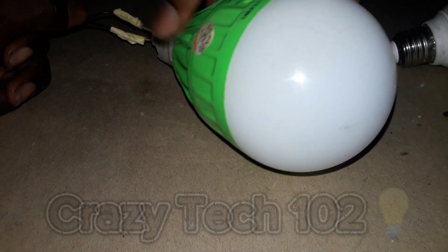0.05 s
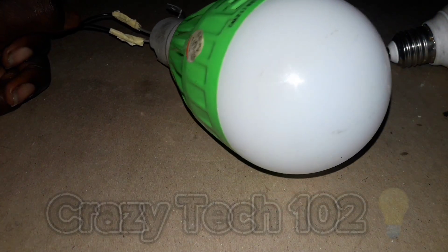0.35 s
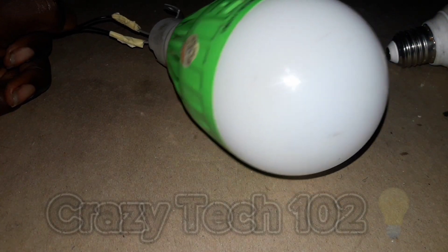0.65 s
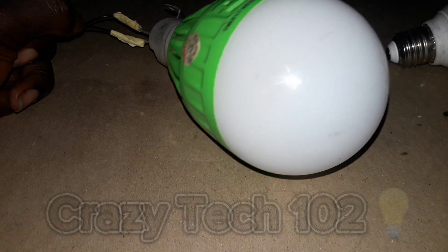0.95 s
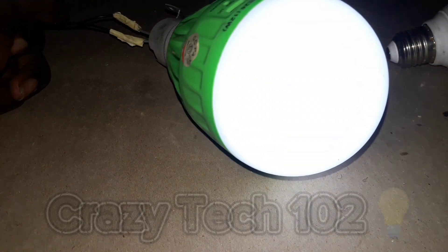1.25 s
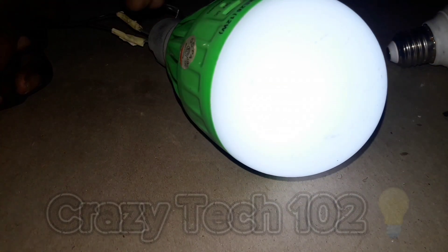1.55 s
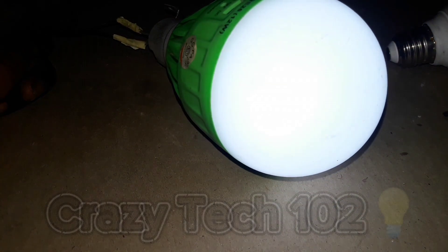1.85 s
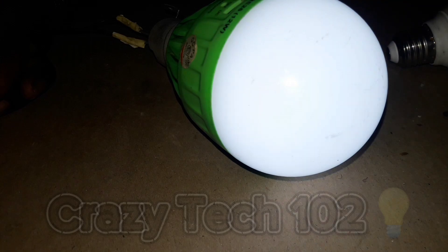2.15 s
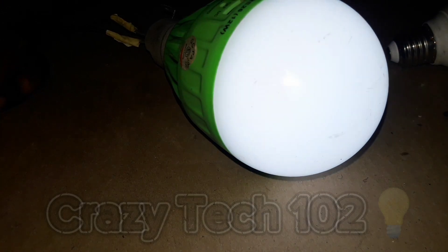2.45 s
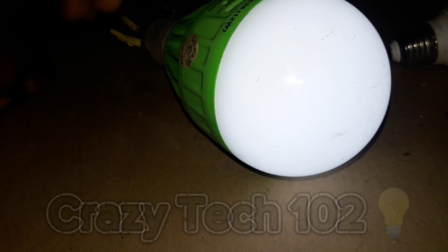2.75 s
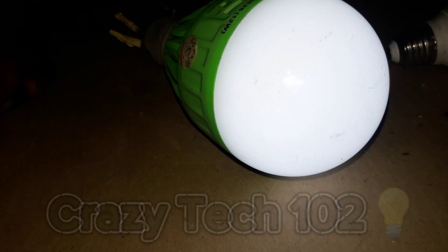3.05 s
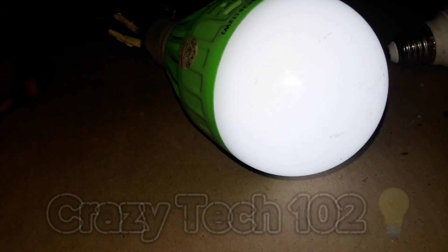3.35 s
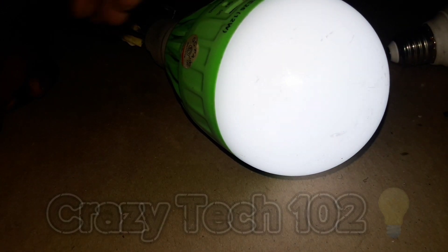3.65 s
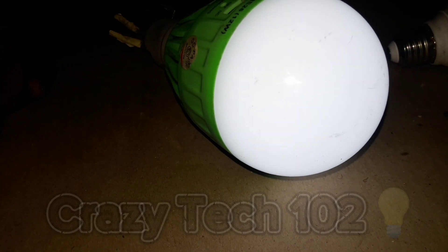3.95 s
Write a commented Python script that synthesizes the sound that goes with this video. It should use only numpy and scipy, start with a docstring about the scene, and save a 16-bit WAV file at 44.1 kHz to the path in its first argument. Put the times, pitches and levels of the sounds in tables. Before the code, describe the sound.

Close, raspy gear whine of a small generator turned by hand, speeding up with each push.

```python
"""A close, surging gear whine: a small generator cranked by hand to light a bulb.
Each push speeds up the rotor and sweeps the tooth harmonics through the housing's resonances.
The teeth rasp, and chatter at the fastest push; the unbalanced rotor growls underneath.
A brief rustle and faint handling lead in, and a low hum fills the room throughout."""
import sys
import numpy as np
from scipy.fft import rfft, irfft, next_fast_len
from scipy.io import wavfile
from scipy.ndimage import map_coordinates

SR = 44100
rng = np.random.default_rng(int(sys.argv[2]) if len(sys.argv) > 2 else 0)


def waveform_to_disk(signal):
    """Save audio, clipped to [-1, 1], as 16-bit WAV at the path in sys.argv[1]."""
    frames = np.transpose(np.atleast_2d(signal))
    scaled = np.clip(frames, -1, 1) * 32767
    samples = np.round(scaled).astype(np.int16)
    wavfile.write(sys.argv[1], SR, samples)


N = 176400
TEETH, REF_HZ = 10, 160  # teeth per rotor turn; reference rotor speed


def generator():
    """One rotor, surging with each push of the hand, drives every gear layer."""
    # rotor speed: t/s, rate/Hz
    pushes = [(1.0, 61.5), (1.08, 72.18), (1.2, 106.75), (1.33, 108.12), (1.42, 97.23), (1.51, 85.91),
              (1.58, 97.76), (1.79, 153.08), (1.95, 127.27), (2.03, 112.05), (2.11, 104.99), (2.25, 150.36),
              (2.31, 172.58), (2.43, 167.15), (2.52, 144.04), (2.6, 130.9), (2.67, 139.03), (2.75, 156.26),
              (2.82, 167.89), (2.9, 156.14), (3.1, 162.25), (3.2, 169.34), (3.3, 181.98), (3.53, 163.19),
              (3.66, 197.26), (3.72, 207.1), (3.79, 189.33), (3.87, 170.74), (3.93, 175.86), (4.0, 177.54)]
    speed = glide(pushes) * (1 + .002 * wobble(45))
    angle = 2 * np.pi * np.cumsum(speed) / SR
    return whine(speed, angle) + rasp(angle) + growl(speed, angle) + start_up(angle)


def whine(speed, angle):
    """Mesh harmonics and sidebands swell as they sweep through the housing's resonances."""
    # tooth harmonics 1-8: level/dB, growth/dB per speed doubling
    mesh = [(-1, 32.5), (0.5, 18), (-7, 15), (-6, 17.5), (-7.5, 16.5), (-13.5, 7), (-18.5, 0), (-30.5, -5)]
    # sidebands of uneven teeth: rotor multiple, level/dB, growth/dB per speed doubling
    sidebands = [(7, -15.5, 15), (8, -1, 12), (9, -10, 40), (11, -13, 16.5), (12, -8, 22.5)]
    # faint extra whine lines, weak sidebands and two high tooth harmonics: rotor multiple
    faint_orders = [17, 18, 19, 21, 22, 24, 27, 62, 90, 100]
    # housing response: f/Hz, gain/dB
    housing = [(500.0, -38), (800.0, -40), (1110.0, -17.5), (1220.0, -12.5), (1340.0, -22.5), (1500.0, -20),
               (1700.0, -11), (2050.0, -11.5), (2450.0, -17.6), (2750.0, -9), (3070.0, 2.3), (3280.0, -1.5),
               (3420.0, -1), (3750.0, -9), (4100.0, -6), (4350.0, -15.5), (5000.0, -10), (5450.0, -5),
               (5800.0, -11.3), (6150.0, -3.5), (6500.0, -5.5), (6760.0, 1), (7300.0, -7.5), (7900.0, -16),
               (8400.0, -37), (9100.0, -21), (9700.0, -32), (11500.0, -12), (16000.0, -12)]
    # how firmly the teeth mesh: t/s, level/dB
    contact = [(0.98, -57), (1.06, -6), (1.12, -1), (1.18, -1.4), (1.25, 6.5), (1.33, 3), (1.44, 4.5),
               (1.55, 0.5), (1.63, 3.3), (1.7, -2.5), (1.8, 4), (1.92, -1), (2.03, 2.6), (2.16, 1.5),
               (2.28, 0), (2.33, 1.3), (2.43, 0.5), (2.49, 0), (2.53, 0.5), (2.68, -0.7), (2.76, 2.4),
               (2.87, -1), (3.0, -0.6), (3.13, -0.7), (3.19, 2.1), (3.24, -4.5), (3.3, 1.7), (3.36, -3.6),
               (3.42, 1.5), (3.49, -7.5), (3.62, -3.5), (3.68, -6), (3.73, -7.8), (3.85, -6), (4.0, -1.6)]
    harmonics = [(TEETH * k, db, growth) for k, (db, growth) in enumerate(mesh, 1)]
    faint = [(order, -26, 0) for order in faint_orders]
    octaves = np.log2(speed / REF_HZ)
    out = np.zeros(N)
    for order, db, growth in [*harmonics, *sidebands, *faint]:
        flicker_db = (2.3 + .9 * np.log2(order / (2 * TEETH))) * wobble(48)  # deeper up high
        level = db + growth * octaves + along(housing, order * speed) + flicker_db
        roughness = 1 + .17 * (wobble(520) + 1j * wobble(520))
        play_rad = .007 * (REF_HZ / speed) * wobble(200)  # gear play blurs the high partials
        phase = order * (angle + play_rad) + rng.uniform(0, 2 * np.pi)
        out += amp(level) * np.real(roughness * np.exp(1j * phase))
    return np.sqrt(2) * amp(curve(contact) - 14.5) * (1 + 6.2 * chatter()) * out


def rasp(angle):
    """Each tooth rubs in a tiny noise burst, harder on one side of the turn."""
    # rubbing strength: t/s, level/dB
    rubbing = [(1.0, -67), (1.03, -49.5), (1.24, -39.5), (1.55, -43.5), (1.8, -34), (1.96, -39.5),
               (1.98, -38), (1.99, -39), (2.04, -39.5), (2.36, -31), (2.6, -38), (3.41, -31), (3.5, -33.5),
               (3.78, -29), (3.84, -39.5), (4.0, -33.5)]
    # rasp colour: f/Hz, gain/dB
    colour = [(300, -18), (800, -27), (1200, -17), (1550, -16.5), (1800, -5.5), (2100, -7.5), (2450, -10.5),
              (2800, -1.5), (3150, 9.5), (3550, 4.5), (4000, -8), (4550, -7), (5300, -0.5), (6000, 1.5),
              (6800, 4.5), (7500, -5.5), (8400, -23), (9800, -20), (12000, -14.5), (15800, -14)]
    pulses = np.exp(.3 * np.cos(TEETH * angle) + .1 * np.cos(angle))
    grain = amp(.7 * wobble(300))
    fade_in = np.clip((clock() - 1) / .1, 0, 1)
    level = amp(14.5 + curve(rubbing)) * fade_in
    return (level + chatter()) * noise(colour, pulses * grain)


def chatter():
    """Envelope of the short bursts of tooth chatter that kick the whine and rasp."""
    # chatter bursts: t/s, length/s, level/dB
    bursts = [(1.975, 0.015, -37), (2.129, 0.0083, -44), (3.716, 0.016, -14.5), (3.748, 0.013, -21),
              (3.779, .022, -19)]
    return sum(amp(db) * np.exp(-(2 * (clock() - s) / length) ** 2) for s, length, db in bursts)


def growl(speed, angle):
    """The unbalanced rotor hums and shakes the housing once a turn, harder with speed."""
    # shaken housing's colour: f/Hz, gain/dB
    colour = [(700, -34), (1050, -25), (1250, -7.5), (1450, -23), (1730, 5.5), (2100, -5.5), (2450, -13),
              (3500, -25)]
    octaves = np.log2(speed / REF_HZ)
    fade_in = np.clip((clock() - 1) / .34, 0, 1)
    shaft = np.sqrt(2) * amp(-41.5 + 11.5 * octaves + .86 * wobble(14)) * np.sin(angle)
    pulses = np.exp(1.3 * np.cos(angle))
    shake = noise(colour, pulses) * amp(-32.5 + 15.5 * octaves + 3.6 * wobble(24.89))
    return fade_in * (shaft + shake)


def start_up(angle):
    """The slow gears scrape, and two rough mesh harmonics squeal up through the same resonance."""
    # scrape swell: t/s, level/dB
    swell = [(.99, -63), (1.005, -37), (1.04, -38), (1.05, -28), (1.065, -32.5), (1.09, -22.5),
             (1.135, -20.5), (1.18, -26), (1.3, -46)]
    # scrape resonance: f/Hz, gain/dB
    resonance = [(2000, -34), (2700, -17), (3200, -5.5), (3480, 3.5), (3750, -1), (4200, -32), (6000, -55)]
    # squealing harmonics: rotor multiple
    orders = [40, 50]
    tones = sum(np.cos(order * angle + .8 * wobble(250)) for order in orders)
    squeal = np.sqrt(2) * filtered(tones, lambda hz: amp(along(resonance, hz)))
    level = amp(curve(swell) + 2.8 * wobble(110))
    return level * (.5 * noise(resonance) + amp(-1) * squeal)


def rustle():
    """A bright puff of noise that dies away at once."""
    # rustle colour: f/Hz, gain/dB
    colour = [(530, -47), (900, -15), (1180, -11), (1420, -22), (1770, -3.5), (2890, -14), (3140, -7.5),
              (5120, -4), (6820, -6), (8340, -19), (15500, -9.5)]
    return amp(-25.5 - 177 * clock()) * noise(colour)


def handling():
    """Fingers on the crank make a faint, grainy noise."""
    # finger movement: t/s, level/dB
    touch = [(.3, -63), (.58, -50.5), (.65, -54), (.84, -48.5), (1.0, -54), (1.1, -61)]
    # handling colour: f/Hz, gain/dB
    colour = [(1200, -11), (1750, -3.5), (2200, -20), (4500, -10), (5800, 0), (6700, -3.5), (7600, -20)]
    return amp(curve(touch)) * noise(colour, gate=amp(1.6 * wobble(60.1)))


def knocks():
    """Light knocks ring the housing's short-lived modes."""
    # knocks: t/s, level/dB
    hits = [(.458, -53), (.52, -42.5), (0.574, -40.5), (2.112, -20), (2.44, -25)]
    # housing modes: f/Hz, level/dB, t60/s
    modes = [(1200, -12.5, 0.075), (1713, 1.5, 0.035), (2900, -11, 0.019), (3480, -24, .025)]
    out = np.zeros(N)
    for s, hit_db in hits:
        age = np.maximum(clock() - s, 0)
        for hz, mode_db, t60 in modes:
            out += amp(hit_db + mode_db - 60 * age / t60) * np.sin(2 * np.pi * hz * age)
    return out


def room():
    """A bed of wavering hum, low rumble and faint hiss."""
    # hum lines: f/Hz, level/dB
    lines = [(60, -55.5), (134, -49.5), (344.5, -46.5)]
    # rumble colour: f/Hz, gain/dB
    rumble = [(15, -65), (25, -35), (49, -19.5), (96, -8), (124, -2.5), (178, 0), (215, -2.5), (310, -6),
              (341, -3.5), (375, -11), (439, -9.5), (740, -26.5), (1100, -24), (1430, -54), (2420, -120)]
    # hiss colour: f/Hz, gain/dB
    hiss = [(530, 7), (900, -8.5), (1430, -7.5), (2510, -8.5), (2660, -11), (4130, -12), (4880, -12),
            (6650, -10.5), (7770, -20.5), (15500, -9)]
    hum = sum(amp(db + 2.5 * wobble(10)) * np.sin(2 * np.pi * hz * clock() + .9 * wobble(5.1))
              for hz, db in lines)
    return np.sqrt(2) * hum + amp(-42) * noise(rumble) + amp(-50) * noise(hiss)


def amp(db):
    """Decibels to gain."""
    return 10 ** (np.asarray(db) / 20)


def along(points, hz):
    """Read (f/Hz, value) points on a log frequency axis."""
    f, v = np.transpose(points)
    return np.interp(np.log(hz + 1), np.log(f + 1), v)


def clock():
    """Seconds at each sample."""
    return np.arange(N) / SR


def curve(rows):
    """(t/s, value) points joined by straight lines."""
    return np.interp(clock(), *np.transpose(rows))


def glide(rows):
    """(t/s, value) points joined by a natural cubic spline, held before the first."""
    s, v = np.transpose(rows)
    basis = lambda t: np.column_stack([np.abs(t[:, None] - s) ** 3, np.ones_like(t), t])
    ends = np.pad([np.ones_like(s), s], ((0, 0), (0, 2)))
    weights = np.linalg.solve(np.vstack([basis(s), ends]), np.append(v, [0, 0]))
    t = np.linspace(s[0], s[-1], 2000)
    return np.interp(clock(), t, basis(t) @ weights)


def wobble(rate):
    """A smooth random curve, rate knots a second."""
    return map_coordinates(rng.standard_normal(size=8192), [clock() * rate], mode="wrap")


def filtered(x, response):
    """Shape x with a frequency response."""
    m = next_fast_len(N + SR // 2)
    return irfft(rfft(x, m) * response(np.fft.rfftfreq(m, 1 / SR)), m)[:N]


def noise(colour, gate=1):
    """Gated noise, coloured and scaled to rms 1."""
    x = filtered(gate * rng.standard_normal(N), lambda hz: amp(along(colour, hz)))
    return x / np.sqrt(np.mean(x ** 2) + 1e-20)


def scene():
    """Generator, hand sounds and room, mixed in mono."""
    return (generator() + rustle() + handling() + knocks() + room())[None]


def record(dry):
    """Clip peaks at full scale, then cut the extreme treble."""
    return filtered(np.clip(dry[0], -1, 1), lambda hz: hz < 15900)[None]


dry = scene()
out = record(dry)
waveform_to_disk(out)
```